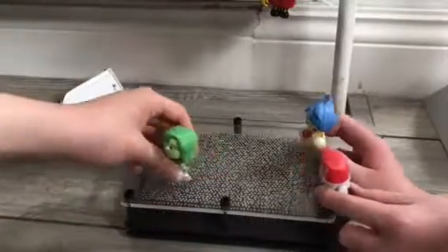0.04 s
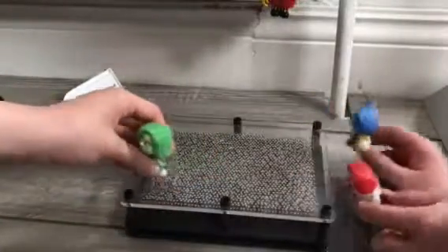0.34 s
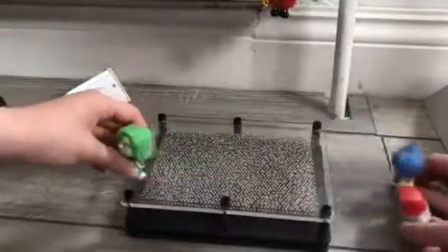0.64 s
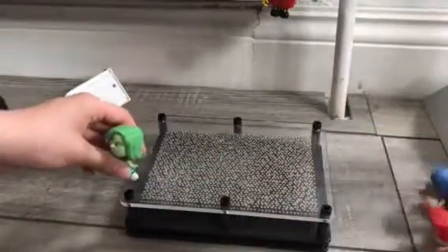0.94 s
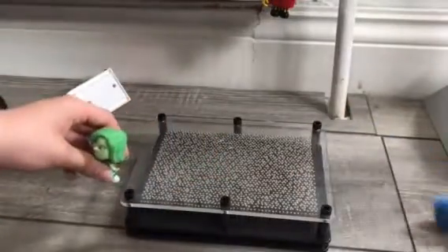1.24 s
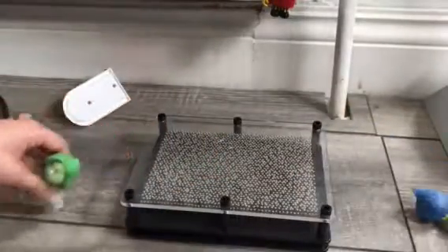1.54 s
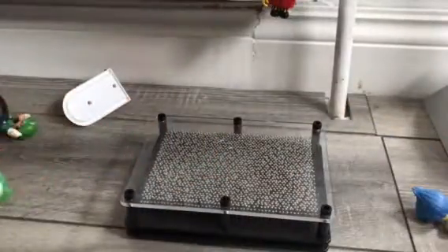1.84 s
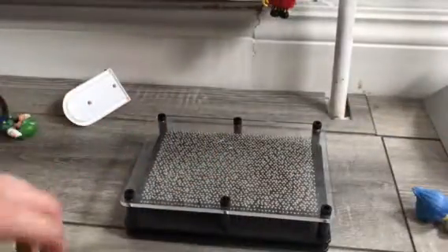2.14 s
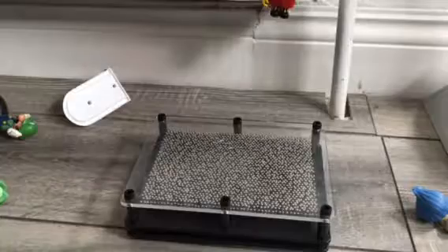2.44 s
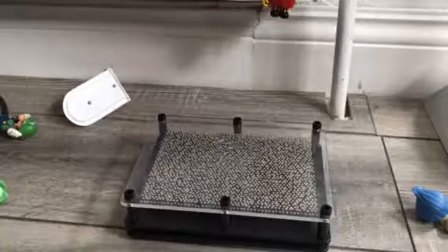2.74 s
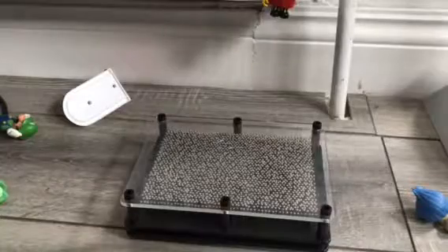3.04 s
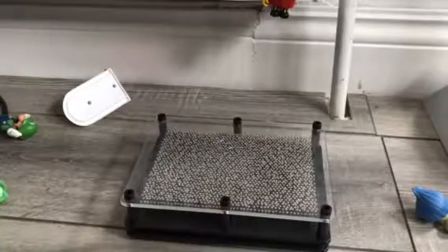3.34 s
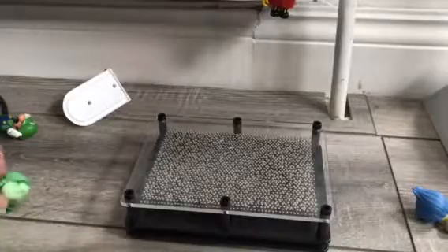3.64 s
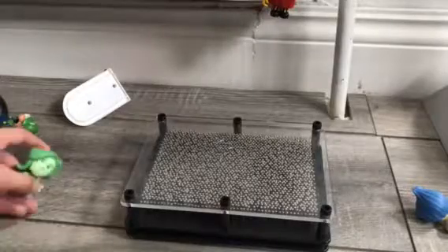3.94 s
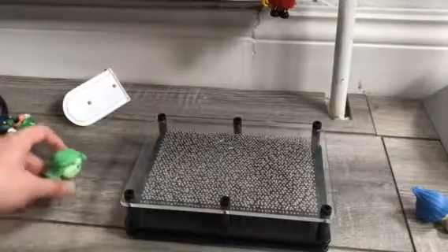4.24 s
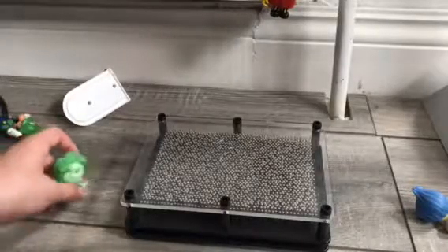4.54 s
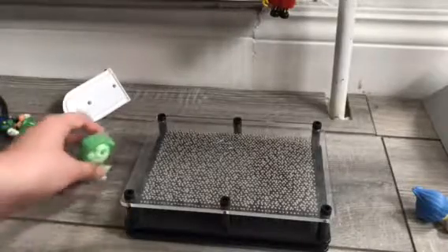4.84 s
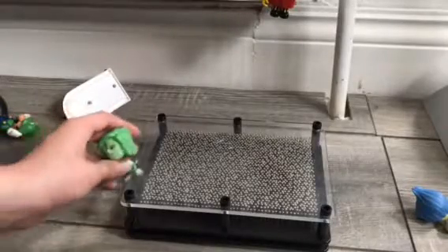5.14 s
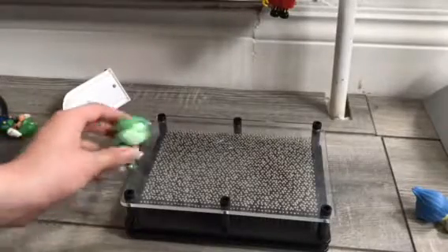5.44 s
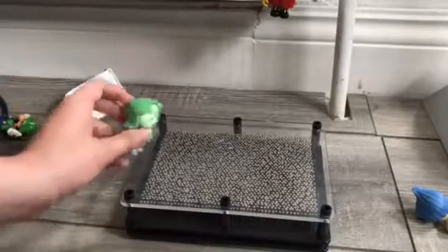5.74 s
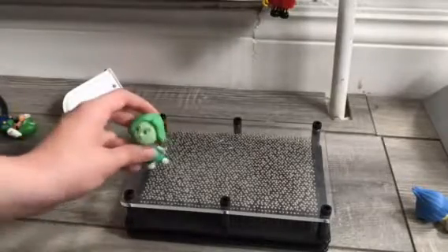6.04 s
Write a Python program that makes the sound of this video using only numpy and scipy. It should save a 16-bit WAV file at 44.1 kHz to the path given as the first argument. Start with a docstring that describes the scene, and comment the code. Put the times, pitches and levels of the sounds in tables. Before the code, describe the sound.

Light clicks, rubs and a quick bouncing clatter of plastic toy figures on floorboards and a hollow toy case, indoors.

```python
"""Plastic figures on a wooden floor

Small figures are dragged off a pin-art toy. One topples on the hollow floor; another is set down,
picked up and tapped on the toy's frame. Each contact clacks the figure and knocks the boards or the
frame; in between, the plastic rubs, judders and squeaks. A small room echoes, and under it all lie
a low rumble, hiss and a camera's faint regular ticking."""
import sys
import numpy as np
from scipy import signal
from scipy.fft import rfft, irfft, next_fast_len
from scipy.io import wavfile
from scipy.ndimage import map_coordinates

SR = 44100
rng = np.random.default_rng(int(sys.argv[2]) if len(sys.argv) > 2 else 0)


def master(y):
    """Save y as 16-bit WAV."""
    cut = np.clip(np.atleast_2d(y).T, -1, 1)
    pcm = np.round(cut * 32767)  # scale
    wavfile.write(sys.argv[1], SR, pcm.astype(np.int16))


N = 268850
TIME = np.arange(N) / SR
AGE = np.arange(SR // 2) / SR  # seconds since a contact


def amp(db):
    """Turn decibels into a gain."""
    return 10 ** (np.asarray(db) / 20)


def unit(x):
    """Scale a sound to an average (rms) level of 1."""
    return x / np.sqrt(np.mean(x ** 2) + 1e-20)


def unit_hit(x):
    """Scale a hit so that its first 20 ms have an average (rms) level of 1."""
    return x / np.sqrt(np.mean(x[:SR // 50] ** 2) + 1e-20)


def along(points, hz):
    """Read between (Hz, value) points on a logarithmic frequency scale."""
    point_hz, values = np.transpose(points)
    return np.interp(np.log(hz + 1), np.log(point_hz + 1), values)


def wobble(rate):
    """A smooth curve through `rate` random values a second."""
    return map_coordinates(rng.standard_normal(int(N * rate / SR) + 4), [TIME * rate])


def add(track, s, sound):
    """Mix a sound into a track, starting at s seconds."""
    part = track[max(round(s * SR), 0):][:len(sound)]
    part += sound[:len(part)]


def filtered(x, response):
    """Change the strength and timing of each frequency as response(hz) says."""
    size = 2 * next_fast_len((len(x) + SR // 4) // 2)
    hz = np.fft.rfftfreq(size, 1 / SR)
    return irfft(rfft(x, size) * response(hz), size)[:len(x)]


def coloured(x, spectrum):
    """Give a sound the tone drawn by (Hz, dB) points."""
    def response(hz):
        cepstrum = irfft(np.log(amp(along(spectrum, hz)) + 1e-6))
        # Fold the second half onto the first, so nothing sounds before its cause.
        cepstrum[1:len(hz) - 1] *= 2
        cepstrum[len(hz):] = 0
        return np.exp(rfft(cepstrum))
    return filtered(x, response)


def resonate(x, peaks):
    """Let a sound ring through an object's resonances, given as (Hz, width in Hz, dB)."""
    def response(hz):
        total = 0
        for k, (centre, width, db) in enumerate(peaks):
            damping = 1j * hz * width
            total += (-1) ** k * amp(db) * damping / (centre ** 2 - hz ** 2 + damping)
        return total
    return filtered(x, response)


def soften(x, corner_hz):
    """Plastic gives a little on contact, which rounds off the treble."""
    return filtered(x, lambda hz: 1 / (1 + 1j * np.sqrt(2) * hz / corner_hz - (hz / corner_hz) ** 2))


def ring(modes, attack_s, spread_db):
    """Struck wood rings with fading tones whose strengths vary, as if hit on a random spot."""
    hz, db, fade_s = np.transpose(modes)[:, :, None]
    strength = amp(db + spread_db * rng.standard_normal(hz.shape))
    waves = np.sin(2 * np.pi * (hz * AGE + rng.random(hz.shape)))
    tones = strength * amp(-60 * AGE / fade_s) * waves
    return unit_hit(tones.sum(0) * (1 - np.exp(-AGE / attack_s)))


def contact(chatter, length_s):
    """A sharp push, followed by a brief chatter of the two surfaces."""
    force = rng.standard_normal(len(AGE)) * np.exp(-(AGE / length_s) ** 2)
    force *= chatter / np.linalg.norm(force)
    force[0] += 1
    return force


def tiny_kicks(per_second):
    """Rough surfaces catch on each other at random moments."""
    return rng.choice([-1, 1], N) * (rng.random(N) < per_second / SR)


def walls(x):
    """The nearby walls and floor send back a few quick copies."""
    # Early echoes. Each row: delay in seconds, gain.
    echoes = [(.0013, 0.082), (.0032, 0.19), (.0052, .22), (0.011, 0.22)]
    return filtered(x, lambda hz: 1 + sum(gain * np.exp(-2j * np.pi * hz * s) for s, gain in echoes))


def room(x, wet_db):
    """The room adds a smooth echo, at level wet_db, in which the treble dies first."""
    # How long the room rings. Each row: frequency in Hz, seconds to fade by 60 dB.
    fade_times = [(150, 0.36), (700, 0.27), (2500, 0.27), (9000, 0.21)]
    hz, seconds, noise = signal.stft(rng.standard_normal(len(AGE)), SR, nperseg=256)
    fade = amp(-60 * seconds / along(fade_times, hz)[:, None])
    tail = signal.istft(noise * fade, SR, nperseg=256)[1][:len(AGE)]
    tail *= 1 - np.exp(-AGE / 0.003)
    return x + amp(wet_db) * signal.fftconvolve(x, tail / np.linalg.norm(tail))[:len(x)]


def background():
    """The room's low rumble wavers a little; the microphone hisses evenly."""
    # The tones of rumble and hiss. Each row: frequency in Hz, relative level in dB.
    rumble_tone = [(15, -44.5), (25, -25.5), (75, -0.5), (125, 0.5), (261, -11.5), (381, -16), (437, -22),
                   (555, -19), (595, -21.5), (756, -20.5), (913, -27), (1500, -35.5), (1950, -74),
                   (3300, -120)]
    hiss_tone = [(710, -15), (1200, -9.5), (2080, -6.5), (2340, -3.5), (2750, -8), (4280, -10),
                 (5090, -8.5), (5670, -10), (6320, -9.5), (7510, -13), (8830, -12), (10200, -19),
                 (11800, -12), (15800, -18)]
    rumble = amp(-64 + 0.79 * wobble(12)) * unit(coloured(rng.standard_normal(N), rumble_tone))
    hiss = amp(-74) * unit(coloured(rng.standard_normal(N), hiss_tone))
    return rumble + hiss


def ticking(period_s=0.050035):
    """A camera ticks faintly twenty times a second, each tick much like the last."""
    # Spells of ticking. Each row: start in seconds, end in seconds.
    spells = [(.0365, 1.35), (1.3787, 6.1)]
    # The tick's resonances. Each row: pitch in Hz, width in Hz, relative level in dB.
    peaks = [(2190, 760, -7), (3500, 420, -8.5), (5084, 266, -1), (6490, 540, -6.5), (8580, 600, -14),
             (11400, 1000, -14.5)]
    force = np.zeros(N)
    for start, end in spells:
        for s in np.arange(start, end, period_s):
            push = contact(chatter=0.97, length_s=0.0031)
            add(force, s, amp(rng.normal(0, 0.27)) * push / np.linalg.norm(push))
    return amp(-76) * unit(resonate(force, peaks))


def stroke_gain(layer, attack_s=0.012, release_db_per_s=487):
    """Each slide takes hold, swells or fades with the pressure, and dies when the hand stops."""
    # Slides of a figure. Each row: start in seconds, length in seconds, swell in dB,
    # then the relative levels of drag, scrape and brush halfway through, in dB.
    strokes = [(0.0, 0.079, -2.5, -48.5, -60.5, -71), (0.103, 0.18, 17, -48, -77, -69),
               (0.476, 0.071, 0, -56.5, -75, -61.5), (0.581, 0.25, 5.5, -66.5, -95, -64.5),
               (0.845, 0.23, -16.5, -54.5, -58, -63.5), (1.108, 0.19, 6, -53, -50.5, -62.5),
               (1.868, 0.046, 4.5, -50, -56, -61.5), (1.941, 0.017, 2, -75, -73, -59.5),
               (3.497, 0.058, 0, -53, -68, -65), (3.61, 0.11, 6.5, -57.5, -61.5, -63),
               (3.988, 0.24, -4, -78, -73, -73.5)]
    gain = np.zeros(N)
    for start, length, swell_db, drag_db, scrape_db, brush_db in strokes:
        level_db = {"drag": drag_db, "scrape": scrape_db, "brush": brush_db}[layer]
        age = TIME - start
        grip = np.clip(age / attack_s + 0.5, 0, 1)
        pressure_db = swell_db * (np.clip(age / length, 0, 1) - 0.5)
        release_db = release_db_per_s * np.clip(age - length, 0, 1)
        gain += grip * amp(level_db + pressure_db - release_db)
    return gain


def brushing():
    """Skin and plastic slide lightly, with a fine uneven grain."""
    # The tone of light rubbing. Each row: frequency in Hz, relative level in dB.
    tone = [(290, -26), (500, 1.5), (776, -9), (1100, -16.5), (1190, -11), (1350, -14), (1800, -8.5),
            (4120, -15.5), (7860, -26.5), (11000, -37), (14300, -60), (22000, -120)]
    grain = rng.standard_normal(N) * amp(0.32 * wobble(100))
    return stroke_gain("brush") * unit(coloured(grain, tone))


def dragging():
    """Soft, uneven bumps of a dragged figure make the hollow floor grumble."""
    # The tone of the grumble. Each row: frequency in Hz, relative level in dB.
    tone = [(29, -39), (50, -7.5), (81, 1), (193, 2), (414, -5.5), (559, -12.5), (630, -4), (789, -14.5),
            (1020, -35.5), (1080, -33.5), (1220, -13), (1330, -28.5), (1500, -39), (1800, -30.5),
            (2340, -55.5), (3960, -120)]
    grumble = unit(coloured(tiny_kicks(per_second=900), tone))
    return room(stroke_gain("drag") * amp(-1.5) * grumble, wet_db=-16.5)


def squeaks():
    """Fast slips of sliding plastic make one resonance sing, swelling and then fading."""
    # Squeaky rubs. Each row: start and length in seconds, pitch and width in Hz, top level in dB.
    rubs = [(0.859, 0.054, 2510, 300, -59), (1.865, 0.052, 2190, 240, -62), (2.564, 0.87, 556, 230, -69.5),
            (3.402, 0.17, 11050, 600, -79.5), (3.677, 0.054, 3600, 1870, -59.5)]
    out = np.zeros(N)
    for start, length, hz, width, db in rubs:
        peak = [(hz, width, 0)]
        rasp = unit(resonate(resonate(rng.standard_normal(N), peak), peak))
        swell = np.sin(np.pi * np.clip((TIME - start) / length, 0, 1))
        out += amp(db) * rasp * swell
    return room(out, wet_db=-6.5)


def scraping(gap_s=0.0095, jitter_s=0.0007, spread_db=1, delay_s=0.001025):
    """A pressed figure sticks and slips: runs of nearly regular jerks over a bed of tiny ones."""
    # Runs of slips. Each row: start and length in seconds, relative starting level in dB,
    # change over the run in dB.
    judders = [(0.8436, .009, -30.5, -20), (0.961, .02, -31.5, -19.5), (1.025, 0.019, -37, -10.5),
               (1.125, .048, -30.5, -27), (1.201, 0.08, -31.5, -3.5)]
    # Resonances of the jerking foot. Each row: pitch in Hz, width in Hz, relative level in dB.
    foot = [(630, 340, 2.5), (1190, 310, 3.5), (1700, 290, -6.5), (2270, 470, -8)]
    # The tone of the tiny slips. Each row: frequency in Hz, relative level in dB.
    tone = [(150, -37.5), (250, -5), (403, -10.5), (678, 4.5), (827, -17.5), (896, -6), (1050, -9),
            (1530, -21.5), (1740, -7), (1860, -12.5), (2210, -7), (2560, -17), (4360, -39.5), (6000, -39),
            (7800, -72.5), (13200, -120)]
    force = np.zeros(N)
    for start, length, first_db, change_db in judders:
        for age in np.arange(0, length, gap_s):
            late, strong = rng.standard_normal(2)
            slip_db = first_db + change_db * age / length + spread_db * strong
            slip = amp(slip_db + 23) * contact(chatter=0.094, length_s=0.0015)
            add(force, start + age + delay_s + jitter_s * late, slip)
    slips = walls(soften(resonate(force, foot), corner_hz=2600))
    grit = soften(coloured(tiny_kicks(per_second=2500), tone), corner_hz=1800)
    bed = stroke_gain("scrape") * amp(-2.5) * unit(grit)
    return room(slips + bed, wet_db=-7)


def frame_hit(frame_db, settle_s=0.00895):
    """The toy's case answers a tap with a short hollow bump, just after the first touch."""
    # Resonances of the hollow case. Each row: pitch in Hz, width in Hz, relative level in dB.
    case = [(107, 40, 7.5), (260, 120, 1.5), (393, 194, 2.5), (600, 154, -0.5)]
    push = contact(chatter=0.81, length_s=0.016)
    bump = np.zeros(len(AGE))
    add(bump, settle_s, amp(frame_db - 2.5) * unit_hit(resonate(push, case)))
    return room(bump, wet_db=-10)


def floor_hit(floor_db, medium_blow_db=-51.5, settle_s=0.006114):
    """The boards knock, then thud and flex as the figure's weight comes down."""
    # The boards' higher tones and the floor's slow flexing.
    # Each row: pitch in Hz, relative level in dB, seconds to fade by 60 dB.
    board_modes = [(409, -1.5, 0.059), (479.3, -4, 0.086), (559, 5.5, 0.059), (596.4, -21.5, 0.094),
                   (633.3, -7, 0.087), (702.4, -3, 0.13), (735, 1.5, 0.11), (820, -3, 0.086)]
    flex_modes = [(107, -13, 0.05), (136.1, -1, 0.27), (217, 2.5, 0.13), (254.5, -9, 0.16),
                  (322, -7.5, 0.096)]
    # The tone of a dull push on the floor. Each row: frequency in Hz, relative level in dB.
    thud_tone = [(40, -39.5), (90, -13.5), (140, 1.5), (210, -2), (290, -5.5), (400, -3), (700, -5),
                 (900, -13.5), (1300, -25.5), (3000, -75)]
    knock_db = floor_db - 9 + 0.35 * (floor_db - medium_blow_db)  # hard blows favour the knock
    boards = amp(knock_db) * ring(board_modes, attack_s=0.0015, spread_db=2)
    thump = amp(floor_db - 5.5) * ring(flex_modes, attack_s=0.002, spread_db=3)
    push = contact(chatter=1.5, length_s=0.022)
    thud = amp(floor_db - 4.5) * unit_hit(coloured(push, thud_tone))
    add(boards, settle_s, thump + thud)
    return room(boards, wet_db=-6.5)


def figure_hit(body, clack_db, snap_db, chatter, length_s, wet_db):
    """One contact gives a clack from the figure's body and a bright snap from its thin edges."""
    # Resonances of the hard edges. Each row: pitch in Hz, width in Hz, relative level in dB.
    edges = [(2040, 290, 2), (2660, 1240, 3), (3406, 1100, 4), (4260, 280, -1), (4480, 590, -9),
             (5180, 380, -6), (6110, 420, -8), (7300, 1600, -18), (9000, 700, -23), (12070, 2200, -31.5)]
    body_ring = soften(resonate(contact(chatter, length_s), body), corner_hz=3593)
    edge_ring = soften(resonate(contact(chatter=4.33, length_s=length_s), edges), corner_hz=9000)
    clack = amp(clack_db - 9.5) * unit_hit(walls(body_ring))
    snap = amp(snap_db - 11) * unit_hit(walls(edge_ring))
    return room(clack + snap, wet_db)


def taps(delay_s=0.0008):
    """Hand-held figures scuff a little as they land; the toppling one bounces crisply."""
    # Resonances of a small figure's body and of the toppling figure's hollow head.
    # Each row: pitch in Hz, width in Hz, relative level in dB.
    body = [(530, 330, 2.5), (910, 270, -17), (1184, 130, -7), (1750, 310, 4), (1893, 580, 2.5)]
    head = [(533.5, 100, -6.5), (697, 150, -3), (1100, 100, -1), (1320, 66, -6.5), (1730, 200, -2.5)]
    # Taps on the floor, taps on the toy's frame and bounces on the floor. Each row: start in
    # seconds, then the relative levels of the clack, the snap and the struck surface in dB.
    floor_taps = [(0.496, -55, -58, -59.5), (0.5241, -48, -53.5, -51.5), (0.846, -62, -52.5, -43),
                  (1.2932, -42, -48.5, -54), (1.7962, -42.5, -38.5, -39.5), (1.8165, -36.5, -52, -45),
                  (1.962, -43, -46, -46.5), (1.9779, -32.5, -33, -34), (2.0325, -49, -47, -44.5),
                  (2.0584, -50, -50, -59), (3.512, -68, -67, -52.5), (3.529, -62, -51.5, -46.5),
                  (3.6038, -53, -51.5, -49.5), (3.9855, -53, -52.5, -51)]
    frame_taps = [(0.071, -55, -81, -63), (0.285, -68, -54, -45), (0.3565, -36.5, -44.5, -43),
                  (5.1952, -62, -54.5, -63.5), (5.5136, -42.5, -45.5, -53), (5.5913, -48, -49.5, -47),
                  (5.6293, -50, -67, -60), (5.673, -47, -51.5, -55), (6.0004, -47.5, -52, -45.5)]
    bounces = [(1.345, -30, -33.5, -44), (1.376, -20, -32.5, -33), (1.4115, -25.5, -35, -44),
               (1.441, -32, -34.5, -46.5)]
    out = np.zeros(N)
    for s, clack_db, snap_db, floor_db in floor_taps:
        figure = figure_hit(body, clack_db, snap_db, chatter=1.9, length_s=0.007, wet_db=-7.5)
        add(out, s + delay_s, figure + floor_hit(floor_db))
    for s, clack_db, snap_db, frame_db in frame_taps:
        figure = figure_hit(body, clack_db, snap_db, chatter=2.5, length_s=0.0097, wet_db=-9)
        add(out, s + delay_s, figure + frame_hit(frame_db))
    for s, clack_db, snap_db, floor_db in bounces:
        figure = figure_hit(head, clack_db, snap_db, chatter=1.2, length_s=0.0052, wet_db=-9.5)
        add(out, s + delay_s, figure + floor_hit(floor_db))
    return out


def scene():
    """All the sources meet at one microphone."""
    return (taps() + scraping() + squeaks() + dragging() + brushing() + ticking() + background())[None]


def record(dry):
    """The microphone loses the deep bass, and the camera drops the very highest treble."""
    low_cut_hz, top_hz = 48, 15950
    low_cut = signal.butter(3, low_cut_hz, "highpass", fs=SR, output="sos")
    thin = signal.sosfilt(low_cut, dry)
    return np.array([filtered(channel, lambda hz: hz < top_hz) for channel in thin])


dry = scene()
out = record(dry)
master(out)
```